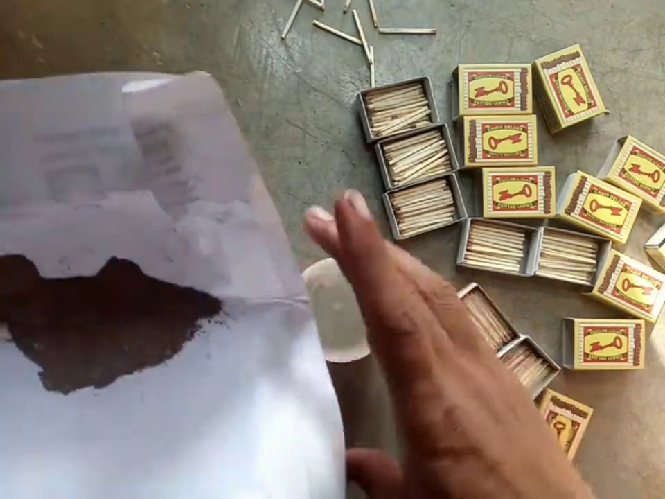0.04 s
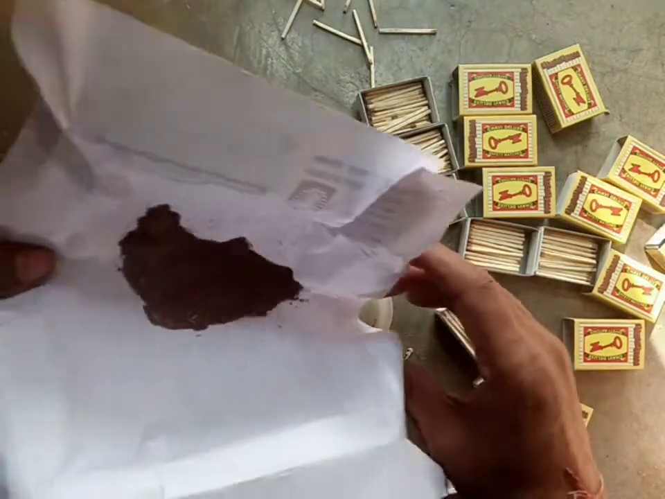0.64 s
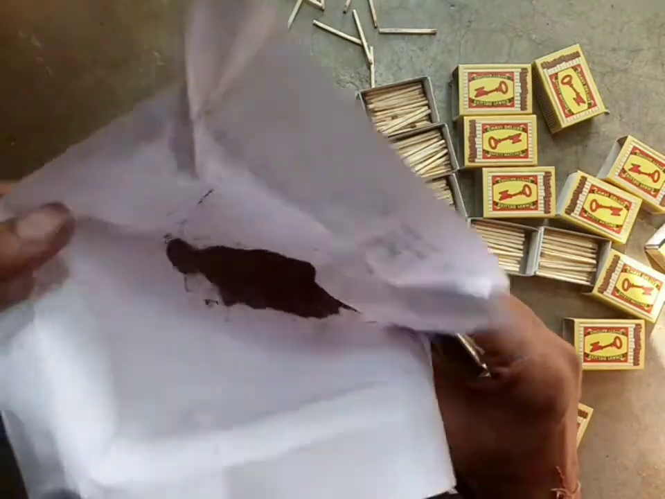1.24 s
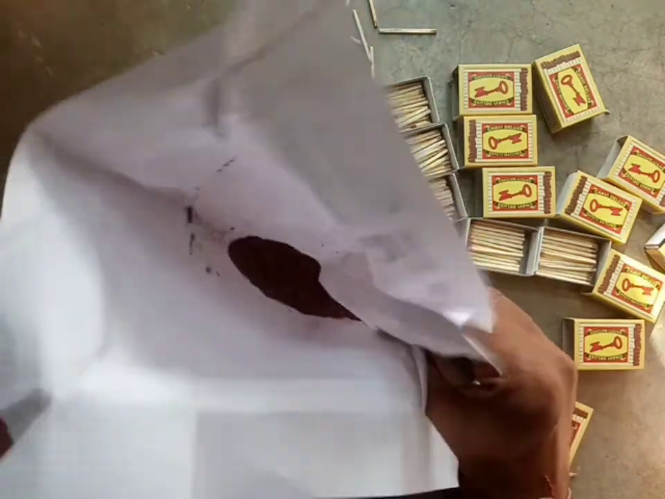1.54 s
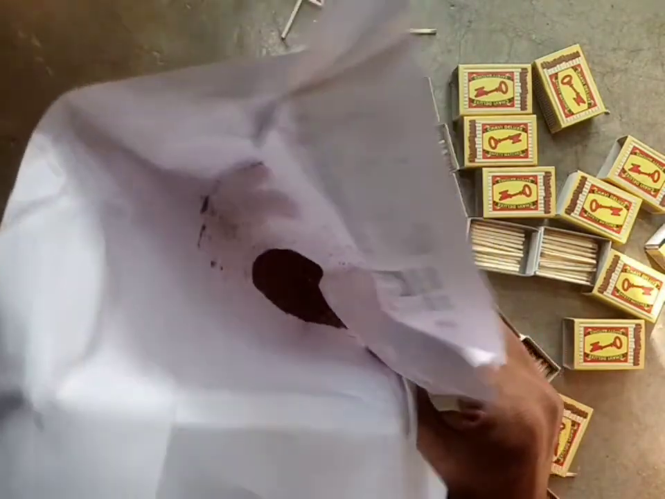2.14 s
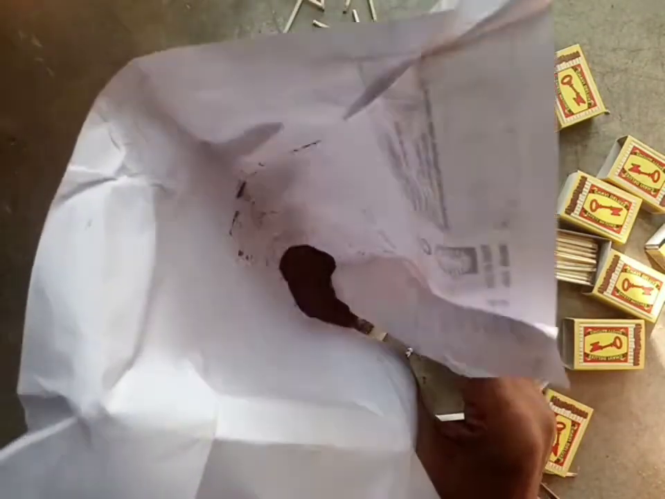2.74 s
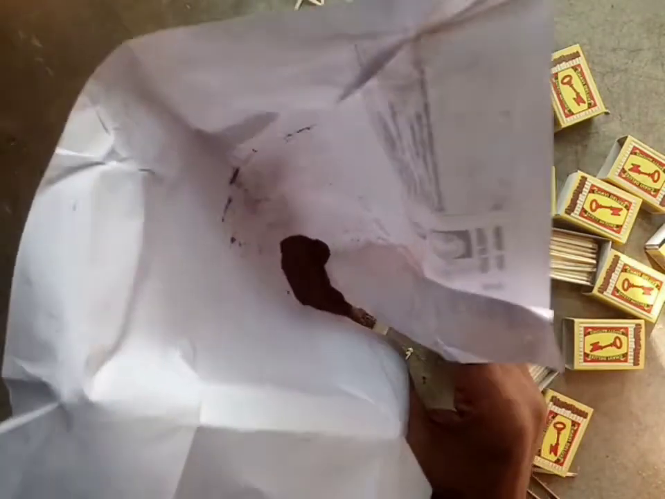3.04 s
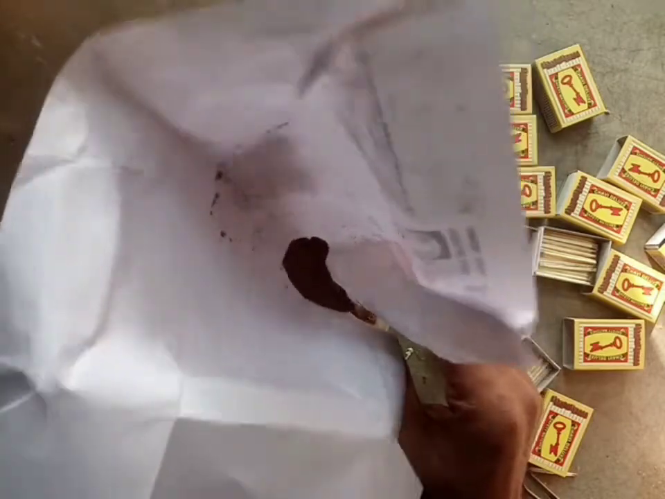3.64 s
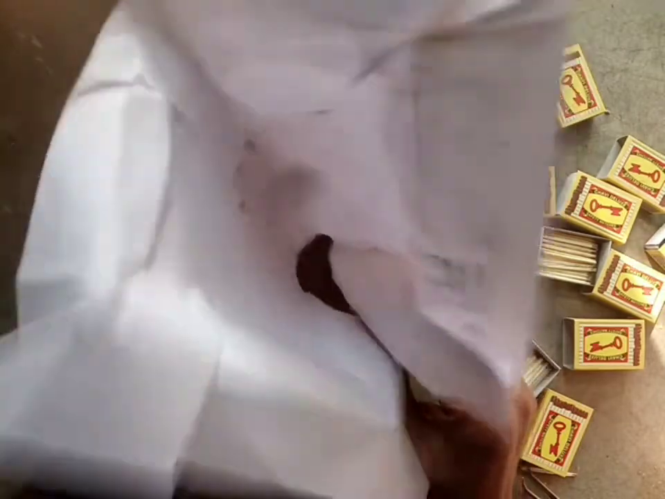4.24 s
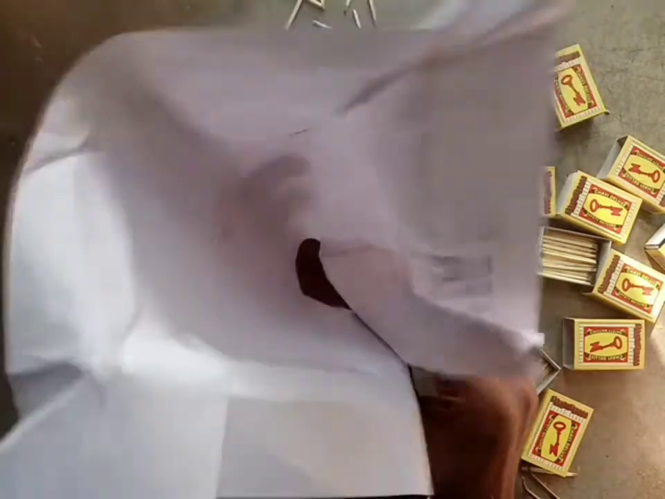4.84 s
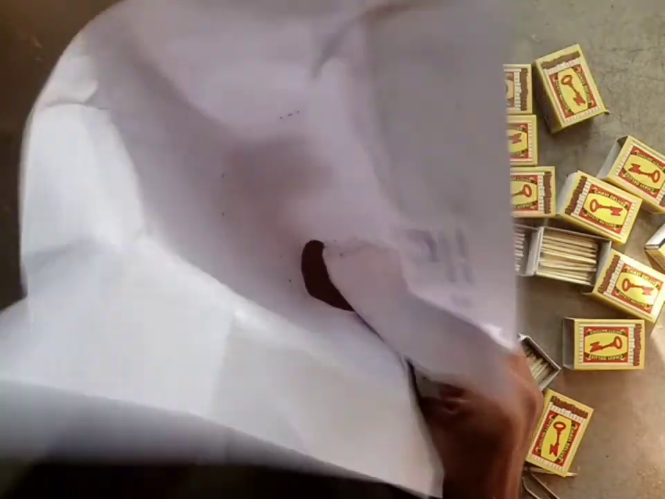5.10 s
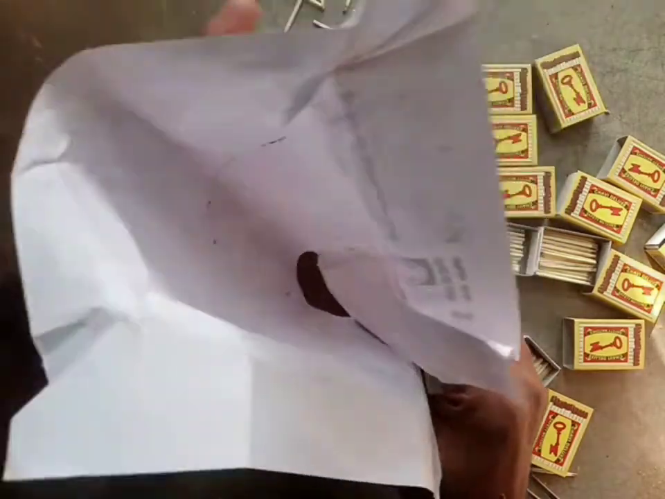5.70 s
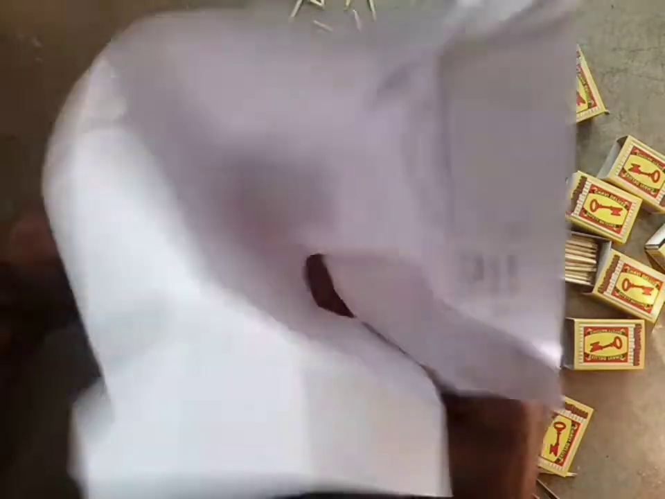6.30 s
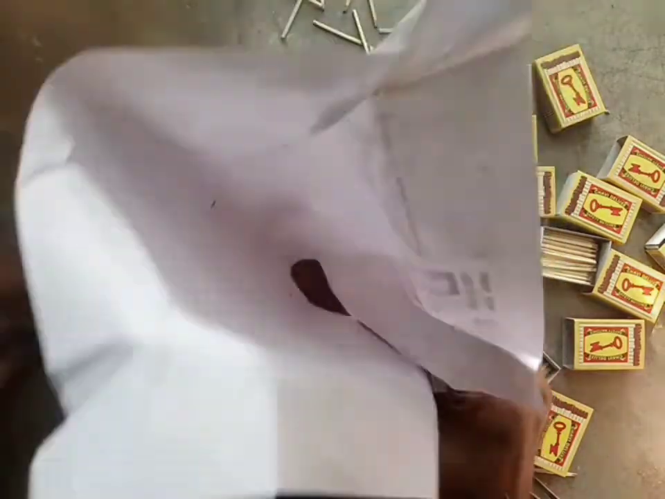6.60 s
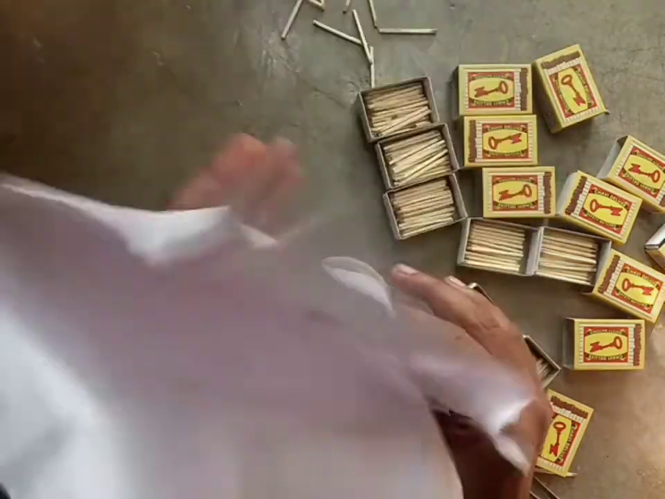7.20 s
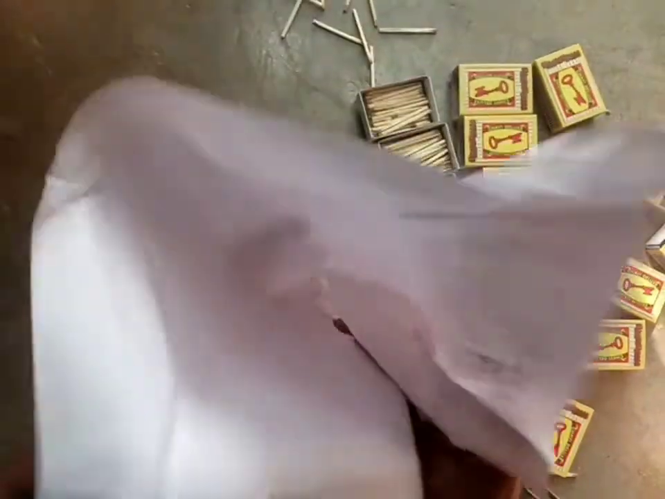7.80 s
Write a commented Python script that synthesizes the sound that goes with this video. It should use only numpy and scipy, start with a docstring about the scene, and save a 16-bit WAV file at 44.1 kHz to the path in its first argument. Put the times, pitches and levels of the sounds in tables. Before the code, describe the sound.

Close, stiff paper crackles and rustles as it is shaken to pour hissing powder, growing louder toward the end.

```python
"""A stiff paper funnel is flexed and shaken to pour gritty powder into a bottle, in a small hard room.
First the creases snap softly, close by, each trailing a rustle and the room's answer. From half a second
powder hisses down the fold; then panels pop, a far bird whistles now and then and the sheet flutters.
At 4 s the crackle grows louder. After a lull near 5.6 s, where the bird is last heard, come the
hardest snaps and the biggest swishes of powder."""
import sys
import numpy as np
from scipy import signal
from scipy.fft import rfft, irfft
from scipy.io import wavfile

SR = 44100
rng = np.random.default_rng(int(sys.argv[2]) if len(sys.argv) > 2 else 0)


def transcribe(u):
    """Save the signal u as a 16-bit wav file named by the first command-line argument.

    u: samples, shape (n,) or (channels, n), limited to [-1, 1]; the rate is SR.
    q: integer samples, one column per channel.
    """
    v = np.clip(np.atleast_2d(u).T, -1, 1)
    q = np.round(v * 32767).astype(np.int16)
    wavfile.write(sys.argv[1], SR, q)


N = 350595

# creases giving way; bass, treble, top and creak are relative to the snap:
# (time [s], level [dB], bass [dB], treble [dB], top [dB], burst length [s], creak [dB])
SNAPS = [(0.125, -45, -13, -24, -58, 0.0019, -12), (0.428, -39, -17, -12, -46, 0.0037, -12),
         (0.573, -65.5, -37, 2, 1, 0.0023, -18), (0.657, -45.5, -29, -15, -31, 0.007, -18),
         (0.821, -60, -29, 5, -4, 0.0019, -20), (0.882, -48, -22, -3.5, -11, 0.0036, -17),
         (0.905, -36, -11, -7.5, -14, 0.0027, -23), (0.917, -47.5, -11, -26, -25, 0.002, -15),
         (1.03, -43.5, -12.5, -13, -37, 0.0027, -24), (1.073, -48, -12, 9.5, -7, 0.0075, -16),
         (1.082, -38.5, -31, 4, -8, 0.0025, -8), (1.204, -61, -28, 2, -9, 0.0021, -22),
         (1.221, -35.5, -17.5, -7, -34, 0.0015, -20), (1.234, -43, -13, -30, -35, 0.0016, -50),
         (1.272, -49.5, -4.5, -9, -18, 0.0018, -18), (1.304, -42, -10.5, -15.5, -30, 0.0037, -29),
         (1.432, -48.5, -9, -6, -18, 0.00095, -9), (1.476, -52.5, 1, 2.5, -13, 0.0019, -20),
         (1.553, -46, -14, -12, -25, 0.002, -17), (1.609, -36.5, -23, -8, -31, 0.0021, -23),
         (1.678, -66, -24, 5, -5, 0.002, -23), (1.731, -63.5, -19, 0, -5, 0.0025, -23),
         (1.802, -58, -25, -2, -20, 0.0033, -20), (1.822, -44.5, -9.5, -8, -20, 0.0025, -10),
         (1.875, -40.5, -5, -9, -14.5, 0.0025, -9), (1.968, -50.5, -9, -4.5, -10, 0.0036, -18),
         (2.016, -55.5, -21, 4, -4.5, 0.0023, -16), (2.092, -56.5, -7, -1, -10, 0.0021, -16),
         (2.107, -41, -19, -7.5, -18, 0.0009, -4), (2.145, -46, -31, -4, -13, 0.0038, -9),
         (2.243, -48, -22, -3, -16, 0.0018, -17), (2.281, -48, -16, -3.5, -19, 0.0018, -10),
         (2.358, -44.5, -11.5, -9, -19, 0.0025, -15), (2.515, -52, -10.5, -7, -21, 0.0017, -10),
         (2.668, -45.5, -11, -4.5, -15, 0.0012, 3), (2.777, -48.5, -11.5, -5, -17, 0.0042, -13),
         (2.804, -39.5, -6.5, -22, -30, 0.0016, -10), (2.848, -44, -12, -6.5, -18, 0.0016, -16),
         (2.933, -47, -12.5, -9.5, -21, 0.0029, -4), (3.051, -42.5, -13, -8.5, -19, 0.0026, -7),
         (3.068, -41, -9, -12.5, -22, 0.0026, -18), (3.125, -55.5, -6, 1, -19, 0.0033, -20),
         (3.197, -48, -14, -4, -15, 0.0017, -5), (3.248, -51, -14.5, -0.5, -11, 0.0029, -20),
         (3.331, -44, -9, -6.5, -15.5, 0.0022, -6), (3.382, -49, -5, -8.5, -14, 0.0017, -20),
         (3.416, -49, -14, -7, -18, 0.0046, -20), (3.492, -46, -6.5, -7, -15.5, 0.0019, -11),
         (3.52, -37.5, -10.5, -14, -24, 0.0022, -24), (3.64, -40.5, -11.5, -7.5, -19.5, 0.0025, -14),
         (3.705, -55, -28, -3, -18, 0.0017, -44), (3.775, -51, -8, -6.5, -19, 0.0025, -18),
         (3.844, -49, -10, -8.5, -27, 0.0019, -11), (3.939, -45.5, -9.5, -7.5, -19, 0.0015, -12),
         (4.004, -47, -9.5, -5, -20, 0.002, -24), (4.057, -52.5, 0, -4, -13, 0.0031, -20),
         (4.095, -27, -12.5, -14.5, -28, 0.0048, -3), (4.166, -42, -3.5, -9, -19, 0.0014, -20),
         (4.238, -30.5, -9, -11, -27, 0.0049, -30), (4.271, -32, -6.5, -6.5, -26, 0.0011, -18),
         (4.324, -30.5, -6, -10.5, -21, 0.0018, -22), (4.34, -28, -13.5, -9.5, -21, 0.0015, -20),
         (4.395, -30.5, -11, -12.5, -24, 0.0025, -20), (4.42, -27.5, -13, -13.5, -26, 0.0023, -28),
         (4.469, -34, -2.5, -6.5, -19, 0.0038, -27), (4.553, -37, -8.5, -10, -21, 0.0015, -20),
         (4.674, -34.5, -8, -13.5, -22, 0.0018, -18), (4.683, -41, -8, -20, -22, 0.004, -23),
         (4.753, -33.5, -7, -12.5, -22.5, 0.002, -21), (4.822, -24.5, -11, -11.5, -22, 0.0027, -31),
         (4.833, -26.5, -7.5, -7.5, -20, 0.0025, -12), (4.871, -42.5, -5, -2.5, -15.5, 0.003, -14),
         (4.962, -34, -17.5, -9.5, -18.5, 0.0028, -36), (4.975, -30.5, -17.5, -18, -43.5, 0.0021, -15),
         (5.003, -42, -3.5, -7.5, -19, 0.0027, -22), (5.029, -45, -20, -6, -13, 0.0032, -20),
         (5.097, -27, -17, -15, -25, 0.0025, -27), (5.138, -37.5, -4, -7, -18, 0.0022, -18.5),
         (5.24, -30.5, -9, -7, -23, 0.0028, -26), (5.251, -23, -15.5, -14.5, -27, 0.0025, -13),
         (5.272, -35.5, -5.5, -2, -20.5, 0.0022, -23), (5.356, -52, -22.5, -1.5, -8.5, 0.0021, -7),
         (5.424, -51.5, -7, -11.5, -22, 0.003, -12), (5.482, -54.5, -23, -6.5, -32, 0.0023, -26.5),
         (5.844, -28.5, -12, -10.5, -31, 0.0015, -12), (5.852, -25.5, -10.5, -11, -30, 0.0023, -23),
         (5.876, -35, -8, -7.5, -35, 0.0025, -12), (5.883, -25.5, -20, -15, -43, 0.0038, -24),
         (5.919, -29, -13.5, -4.5, -21, 0.0025, -22), (5.957, -31, -11, -14.5, -32, 0.0017, -18),
         (6.011, -32, -10, -11, -25, 0.0031, -9), (6.029, -23, -18.5, -1.5, -11.5, 0.0031, -8),
         (6.076, -25.5, -14, -10, -24, 0.0031, -5), (6.099, -21.5, -15, -5, -18.5, 0.0014, -8),
         (6.164, -25, -14, -5, -15, 0.0026, -15), (6.206, -23, -20, -5, -21, 0.002, -11),
         (6.266, -25, -10.5, -9, -32, 0.0038, -16), (6.28, -27, -24, -12.5, -32, 0.0036, -26),
         (6.296, -30.5, -19, -10, -19, 0.0029, -22), (6.306, -25, -17, -2.5, -11, 0.0013, -20),
         (6.347, -24.5, -14, -7, -23, 0.0025, -13), (6.382, -21.5, -16.5, -11, -26.5, 0.0017, -16),
         (6.467, -28, -13, 2.5, -8, 0.0013, -26), (6.506, -27, -11.5, -12.5, -26, 0.0028, -19),
         (6.514, -30, -17, -21, -32.5, 0.0036, -18), (6.631, -21.5, -13.5, -4.5, -13.5, 0.0027, -27),
         (6.708, -32.5, -12, -22, -34, 0.0025, -29), (6.768, -25.5, -12.5, -10.5, -27, 0.0049, -5),
         (6.82, -42, -6, 1, -16, 0.0019, -20), (6.849, -28.5, -15, -8.5, -30, 0.0013, -22),
         (6.887, -30.5, -16, -8, -31, 0.0012, -15), (7.142, -20.5, -13.5, -5, -19, 0.0036, -7.5),
         (7.168, -28, -26, -10.5, -23, 0.0031, 5), (7.224, -36.5, -12, -9.5, -28, 0.0023, -20),
         (7.298, -31.5, -16, -10.5, -26, 0.0018, -20), (7.305, -22, -17.5, -5.5, -13, 0.002, -22),
         (7.384, -37, -13, -6.5, -18, 0.0022, -27), (7.462, -42.5, -13.5, -15, -28, 0.004, -17),
         (7.531, -37, -16.5, -9.5, -21, 0.0025, -29), (7.584, -31.5, -17, -9.5, -21, 0.0037, -40),
         (7.607, -46, -7.5, -4, -10, 0.0032, -20), (7.65, -27.5, -17, -19, -25, 0.0016, -38),
         (7.662, -26, -13.5, -2, -17, 0.0011, -30), (7.742, -26, -15, -12.5, -22.5, 0.0027, -7),
         (7.814, -33, -5, -9.5, -22, 0.0015, -16), (7.885, -25, -14, -17.5, -29, 0.0028, -37)]


def amp(db):
    """Decibels to gain."""
    return 10 ** (np.asarray(db) / 20)


def unit(x):
    """Scales to rms 1."""
    return x / np.sqrt(np.mean(x ** 2) + 1e-30)


def read(points, hz):
    """Reads a spectrum on a log-frequency axis."""
    f, value = np.transpose(points)
    return np.interp(np.log(hz + 1), np.log(f + 1), value)


def add(mix, s, sound):
    """Mixes a sound in at time s."""
    part = mix[max(round(s * SR), 0):][:len(sound)]
    part += sound[:len(part)]


def curve(rows):
    """A fader ride through (time [s], level [dB]), as gain."""
    return amp(np.interp(np.arange(N) / SR, *np.transpose(rows)))


def swells(rows):
    """A smooth arch of gain for each (start [s], length [s], level [dB])."""
    gain = np.zeros(N)
    for s, length, db in rows:
        add(gain, s, amp(db) * signal.windows.hann(int(length * SR)))
    return gain


def colour(x, spectrum, size=2048):
    """Minimum-phase EQ from (frequency [Hz], gain [dB]), so that attacks stay sharp."""
    gain_db = np.maximum(read(spectrum, np.fft.rfftfreq(size, 1 / SR)), -100)
    cepstrum = irfft(np.log(amp(gain_db)))
    cepstrum[1:size // 2] *= 2
    cepstrum[size // 2 + 1:] = 0
    return signal.fftconvolve(x, irfft(np.exp(rfft(cepstrum))))[:len(x)]


def grit(count, per_s, spread_db):
    """Tiny clicks at random moments, most of them faint, a few large."""
    size = amp(spread_db * np.minimum(rng.exponential(1, count), 4))
    return unit(size * rng.choice([-1, 1], count) * (rng.random(count) < per_s / SR))


def wander(per_s):
    """A modulator that glides between random values."""
    knots = rng.standard_normal(N // 16)
    return np.interp(np.arange(N) * per_s / SR, np.arange(len(knots)), knots)


def noise_floor(level_db=-88.5):
    """A very faint, steady bed of dark noise."""
    # (frequency [Hz], gain [dB])
    tone = [(20, -6), (110, 1.5), (350, -11), (700, -16), (1350, -11.5), (2300, -20), (7000, -22),
            (16000, -28.5)]
    return amp(level_db) * unit(colour(rng.standard_normal(N), tone))


def snaps(creak_s=0.0033, give_s=0.001243, skirt_db=-16, skirt_s=0.012, body_db=-7.5):
    """A crease creaks as it starts to give, buckles in a run of fibre clicks, and shivers to rest."""
    # tone of stiff paper: (frequency [Hz], gain [dB])
    paper_tone = [(25, -52), (60, -14), (100, -12), (230, -7), (400, 0.5), (600, -4.5), (1050, -3),
                  (1300, -5), (2100, -6), (2700, -13.5), (3300, -17), (6500, -16), (8000, -24.5),
                  (10700, -26), (13000, -34.5), (16000, -36.5)]
    out, lead_s = np.zeros(N), .02
    t = np.arange(SR // 10) / SR
    after = np.maximum(t - lead_s, 0)
    for s, db, bass_db, treble_db, top_db, length, creak_db in SNAPS:
        creak = amp(creak_db) * np.exp(-abs(t - lead_s) / creak_s)
        progress = after / max(length, .001)
        shiver = amp(skirt_db) * np.exp(-after / skirt_s)
        buckle = (np.exp(-progress) + shiver) * (1 - np.exp(-3 * progress))
        clicks = grit(len(t), per_s=22000, spread_db=2) * (creak + buckle)
        ringing = signal.fftconvolve(clicks, sheet_ring(t))[:len(t)]
        snap = balance(colour(ringing, paper_tone), [bass_db, body_db, treble_db, top_db])
        add(out, s + give_s - lead_s, amp(db) * snap)
    return out


def sheet_ring(t, detune=0.016, ring_db=-38):
    """The sheet's answer to a click; its shape changes, so each snap rings at slightly new pitches."""
    # resonances of the folded sheet and the air in it: (pitch [Hz], relative level [dB], t60 [s])
    resonances = [(232, -20, .09), (400, -11, .08), (517, -15, .06), (660, -12, .05), (830, -10, .04),
                  (1050, -11, .04), (1540, -11, .03)]
    hz, db, t60 = np.transpose(resonances)[:, :, None]
    shift = detune * rng.standard_normal(hz.shape)
    sign = rng.choice([-1, 1], hz.shape)
    partials = sign * amp(db - 60 * t / t60) * np.sin(2 * np.pi * hz * (1 + shift) * t)
    return (t == 0) + amp(ring_db) * partials.sum(0)


def balance(x, levels_db, spread_s=0.0057):
    """Four-band EQ that steers a snap to the given levels, its energy averaged over spread_s."""
    # bass, body, treble and top: (low edge [Hz], high edge [Hz])
    bands = [(150, 600), (700, 2500), (3000, 7500), (8500, 16000)]
    hz = np.fft.rfftfreq(len(x), 1 / SR)
    power = 2 * abs(rfft(x)) ** 2 / (len(x) * spread_s * SR)
    eq = []
    for (low, high), db in zip(bands, levels_db):
        lift_db = db - 10 * np.log10(power[(hz > low) & (hz < high)].sum())
        eq += [(low, lift_db), (high, lift_db)]
    return colour(x, eq)


def rustle(rise_s=0.0025, fall_s=0.018, level_db=-42.5, firm_db=-32, slope=0.71):
    """After each snap, paper rubs on paper in little slips and jolted grains settle."""
    # tone of rubbing paper: (frequency [Hz], gain [dB])
    rub_tone = [(40, -36), (150, -7.5), (300, -10.5), (550, 5), (900, -13), (1600, 9), (2600, 0),
                (4000, -14.5), (6700, 3), (8000, -28), (10500, -17), (13000, -25.5), (16000, -22)]
    power, t = np.zeros(N), np.arange(SR // 4) / SR
    envelope = np.exp(-t / fall_s) * (1 - np.exp(-t / rise_s))
    for s, db, _, treble_db, *_ in SNAPS:
        stir = amp(level_db + slope * (db + treble_db - firm_db))  # a crisper snap stirs up more
        add(power, s, (stir * envelope) ** 2)
    slips = grit(N, per_s=10000, spread_db=3.6) * amp(2.8 * wander(per_s=200))
    return np.sqrt(power) * unit(colour(slips, rub_tone))


def room_tail(x, predelay_s=0.0035):
    """Sparse reflections off hard walls; the highs die first."""
    # the room's decay: (frequency [Hz], t60 [s])
    decay = [(150, .3), (500, .25), (1500, .21), (5000, .2), (9000, .16), (14000, .12)]
    # tone of its tail: (frequency [Hz], gain [dB])
    tail_tone = [(150, -14.5), (400, -5.5), (1200, -7.5), (4500, -11), (11000, -12.5)]
    count = SR // 2
    taps = rng.choice([-1., 1.], count) * (rng.random(count) < 3500 / SR)
    taps *= np.arange(count) > predelay_s * SR
    hz, t, spectra = signal.stft(taps, SR, nperseg=256)
    fade = amp(-60 * t / read(decay, hz)[:, None])
    tail = signal.istft(spectra * fade, SR, nperseg=256)[1]
    return signal.fftconvolve(x, colour(tail / np.linalg.norm(tail), tail_tone))[:N]


def room(x, turns_per_s=1.3, count=4):
    """The moving sheet sends its sound along ever-changing paths: tails crossfade, two at a time."""
    place = count * turns_per_s * np.arange(N) / SR
    shares = (np.maximum(1 - abs((place - k) % count - 1), 0) for k in range(count))
    return sum(room_tail(x * np.sqrt(share)) for share in shares)


def powder(hard_db=-11, uneven_db=1.5):
    """Fine grains hiss down the paper and harder ones skip brightly, in a trickle and in swishes."""
    # tones of fine and of hard grains: (frequency [Hz], gain [dB])
    fine_tone = [(50, -48), (200, -26), (350, -13), (600, -10), (850, -3), (1700, -2.5), (2800, -4.5),
                 (4000, -2), (5200, -3), (6700, -.5), (8000, -8.5), (10500, -10), (13000, -15),
                 (16000, -19)]
    hard_tone = [(500, -32), (2000, 4.5), (6500, 15.5), (8200, -1), (11000, -19.5), (16000, -5.5)]
    # the trickle down the fold: (time [s], level [dB])
    trickle = [(.45, -100), (.57, -65), (1.06, -61), (1.16, -69.5), (1.75, -80.5), (3.1, -80), (3.5, -66),
               (3.95, -66), (4.15, -61.5), (4.5, -61), (4.65, -106), (5.0, -63.5), (5.3, -64.5),
               (5.55, -81), (5.8, -91), (7.95, -71)]
    # a shake sends a heap sliding: (start [s], length [s], level [dB])
    swishes = [(1.24, 0.16, -62), (1.41, 0.06, -62), (1.81, 0.19, -63.5), (2.34, .16, -56),
               (2.5, 0.13, -63.5), (2.66, 0.052, -65), (2.78, 0.075, -54.5), (2.92, 0.12, -67.5),
               (3.06, 0.12, -62), (3.21, 0.13, -65.5), (3.32, 0.12, -63.5), (3.63, 0.075, -72),
               (3.78, 0.056, -62), (4.68, 0.078, -57.5), (4.86, 0.073, -59), (5.43, .08, -69),
               (5.58, 0.081, -81), (5.84, 0.087, -50.5), (6.01, 0.24, -48.5), (6.27, 0.16, -49),
               (6.47, 0.081, -49.5), (6.71, .19, -55.5), (7.0, .11, -59), (7.12, .17, -51),
               (7.44, .07, -61), (7.65, 0.19, -57.5), (7.89, 0.072, -58)]
    fine = grit(N, per_s=14000, spread_db=3.2) * amp(1.8 * wander(per_s=90))
    hard = grit(N, per_s=7000, spread_db=3) * amp(4 * wander(per_s=25))
    flow = curve(trickle) * amp(uneven_db * wander(per_s=18)) + swells(swishes)
    return flow * (unit(colour(fine, fine_tone)) + amp(hard_db) * unit(colour(hard, hard_tone)))


def pops(trim_db=-8, rise_s=.0012, fall_s=.008, detune=0.13):
    """A panel pops through with a hollow knock: the air in the fold rings briefly around one pitch."""
    # panels popping: (time [s], peak before trim [dB], pitch [Hz])
    knocks = [(0.658, -47, 797), (0.907, -35, 980), (1.221, -39, 812), (4.097, -33, 770), (4.341, -31, 832),
              (4.42, -29, 800), (4.822, -22, 663), (4.835, -30, 650), (4.869, -38, 780), (4.975, -31, 974)]
    out, t = np.zeros(N), np.arange(SR // 8) / SR
    envelope = (1 - np.exp(-t / rise_s)) * np.exp(-t / fall_s)
    for s, db, hz in knocks:
        cluster_hz = hz * (1 + detune * rng.uniform(-1, 1, (5, 1)))
        phase = rng.random((5, 1))
        knock = envelope * np.sin(2 * np.pi * (cluster_hz * t + phase)).sum(0)
        add(out, s, amp(db + trim_db) * knock / abs(knock).max())
    return out


def bird():
    """Falling whistles, blurred by echoes on their long way."""
    # a far bird's calls: (start [s], length [s], first pitch [Hz], last pitch [Hz], level [dB])
    calls = [(0.663, 0.28, 4180, 3570, -68.5), (2.08, 0.44, 3960, 3420, -70),
             (3.41, 0.33, 3950, 3420, -67.5), (4.95, 0.3, 3980, 3620, -66), (5.566, .19, 4160, 3750, -81.5),
             (5.665, 0.083, 3670, 3370, -79)]
    out = np.zeros(N)
    blur = wander(per_s=450) + 1j * wander(per_s=450)
    for s, length, first_hz, last_hz, db in calls:
        count = int(length * SR)
        turns = np.cumsum(np.linspace(first_hz, last_hz, count)) / SR
        whistle = (np.exp(2j * np.pi * turns) * blur[int(s * SR):][:count]).real
        add(out, s, amp(db) * unit(whistle * signal.windows.tukey(count, .5)))
    return out


def flutter(air_db=-8, modes_db=-6):
    """The broad faces of the sheet bend and push air in soft lumps, now in one mode, now in another."""
    # tone of the pushed air: (frequency [Hz], gain [dB])
    air_tone = [(20, -28), (45, -18), (85, -6), (130, -3), (200, -3), (300, -11), (600, -22), (1500, -60)]
    # bending modes of the faces: (pitch [Hz], width [Hz], relative level [dB])
    modes = [(86, 14, -6), (116, 14, -4), (142, 16, -1), (186, 20, 0), (232, 24, -2)]
    # the hands keep the sheet flexing: (time [s], level [dB])
    handling = [(.8, -112), (1.5, -62), (1.75, -68.5), (2.05, -73.5), (3.2, -77.5), (3.45, -62.5),
                (4.0, -63.5), (4.4, -63.5), (5.3, -56), (5.6, -84.5), (5.8, -103), (5.9, -54.5),
                (6.8, -59.5), (7.08, -74), (7.2, -66), (7.95, -55.5)]
    # a face flops over: (start [s], length [s], level [dB])
    flops = [(.9, .05, -72), (1.25, 0.061, -58), (1.87, 0.063, -44), (2.24, .08, -67), (2.36, 0.061, -68),
             (2.79, 0.04, -71), (3.05, 0.12, -65), (3.48, 0.12, -66), (4.1, 0.12, -51), (4.29, 0.12, -47),
             (4.46, 0.089, -48.5), (4.71, 0.033, -51), (4.96, 0.095, -52), (5.12, 0.049, -41.5),
             (5.27, 0.055, -41), (6.07, 0.075, -44.5), (6.35, 0.053, -52), (6.48, 0.052, -45),
             (6.62, 0.067, -53), (6.76, 0.046, -41), (7.14, 0.096, -54), (7.3, 0.039, -41)]
    lumps = rng.standard_normal(N) * amp(2.5 * wander(per_s=30))
    air = unit(colour(lumps, air_tone, size=8192))
    t, wobble = np.arange(N) / SR, np.zeros(N)
    for hz, width, db in modes:
        sway = wander(width) + 1j * wander(width)
        wobble += amp(db) * (np.exp(2j * np.pi * hz * t) * sway).real
    return (curve(handling) + swells(flops)) * (amp(air_db) * air + amp(modes_db) * unit(wobble))


def stereo_side(x, flicker_per_s=900):
    """The treble flickers a little between left and right."""
    treble = signal.sosfilt(signal.butter(8, 3700, "high", fs=SR, output="sos"), x)
    return colour(treble * wander(flicker_per_s), [(4000, -42), (6000, -32), (9000, -25), (14000, -12)])


def scene():
    """Close paper and powder feed the room; flutter, bird and floor join dry. Nearly mono."""
    near = snaps() + pops() + rustle() + powder()
    mid = noise_floor() + near + room(near) + flutter() + bird()
    side = stereo_side(mid)
    return np.array([mid + side, mid - side])


def record(dry, cutoff_hz=16200):
    """A steep low-pass takes off the very top."""
    lowpass = signal.firwin(401, cutoff_hz, window=("kaiser", 8), fs=SR)
    return signal.oaconvolve(dry, lowpass[None], "same")


dry = scene()
out = record(dry)
transcribe(out)
```